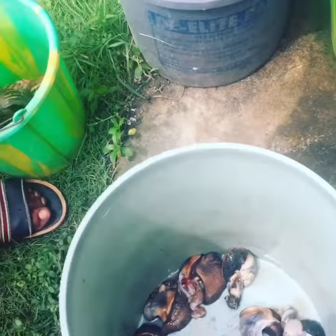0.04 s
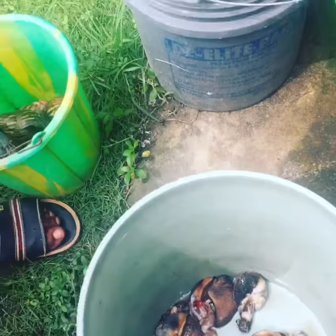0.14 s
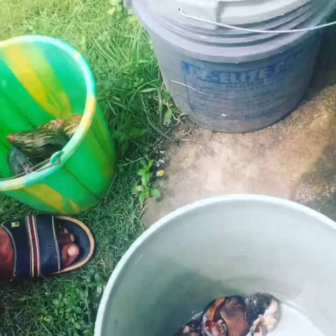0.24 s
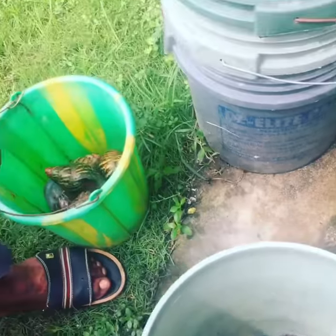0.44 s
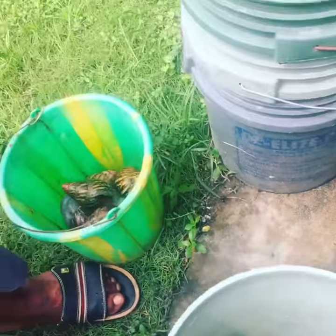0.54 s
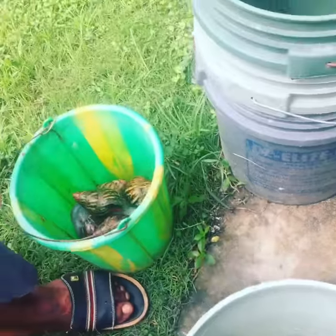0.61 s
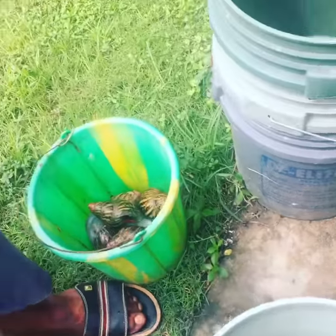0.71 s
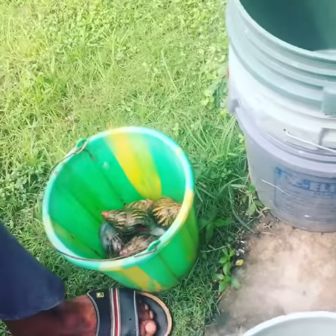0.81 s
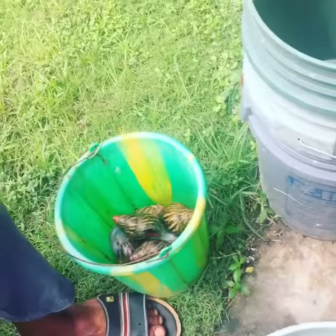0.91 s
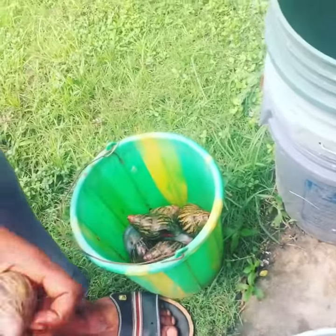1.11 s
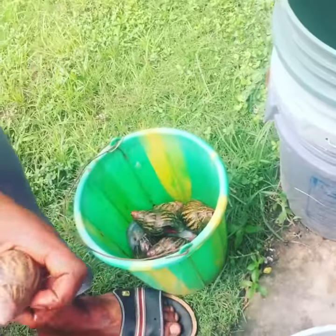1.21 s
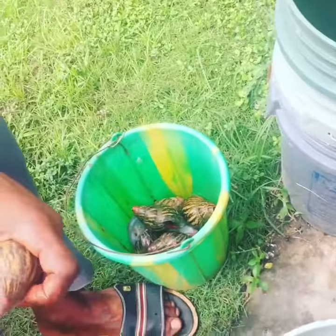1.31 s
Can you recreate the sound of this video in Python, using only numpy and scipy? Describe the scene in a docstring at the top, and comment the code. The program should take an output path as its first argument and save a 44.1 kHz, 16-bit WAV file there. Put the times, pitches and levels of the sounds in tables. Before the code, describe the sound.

A snail shell knocks once, hard and sharp, against a plastic bucket at about 0.2 seconds, with a very brief ring. A soft hiss swells behind it and fades by 0.4 seconds. A few faint hollow bumps follow between 0.5 and 0.7 seconds, and tiny handling ticks continue until about 1.3 seconds. A quiet, low outdoor rumble and thin hiss lie underneath throughout.

```python
"""A low outdoor rumble and thin hiss come first; 0.2 s in, a snail shell is knocked once, hard. The impact
excites the shell's damped modes; a duller reflection of it follows within 9 ms, then a faint second contact.
Plastic buckets and the ground scatter a brief reverberation, and a soft hiss swells and fades behind the knock.
Then only a few faint, hollow bumps and handling ticks sound over the background."""
import sys
import numpy as np
from scipy import signal
from scipy.fft import rfft, irfft, next_fast_len
from scipy.io import wavfile
from scipy.ndimage import map_coordinates

SR = 44100
rng = np.random.default_rng(int(sys.argv[2]) if len(sys.argv) > 2 else 0)


def dump(signal):
    """Clip the signal to [-1, 1] and save it as 16-bit WAV at the path in sys.argv[1]."""
    limited = np.clip(np.atleast_2d(signal).T, -1, 1)
    pcm = np.round(limited * 32767).astype(np.int16)
    wavfile.write(sys.argv[1], SR, pcm)


N = 59535
T = np.arange(N) / SR


def amp(db):
    """Amplitude ratio of a level in decibels."""
    return 10 ** (np.asarray(db) / 20)


def unit(x):
    """Normalisation to rms 1."""
    return x / np.sqrt(np.mean(x ** 2) + 1e-20)


def along(points, hz):
    """Interpolation of (frequency, value) points on a log frequency axis."""
    freqs, values = np.transpose(points)
    return np.interp(np.log(hz + 1), np.log(freqs + 1), values)


def curves(rows):
    """Linear interpolation in time of each column after the first."""
    times, *columns = np.transpose(rows)
    return [np.interp(T, times, column) for column in columns]


def wobble(rate):
    """Smooth random modulation, rate knots a second."""
    return map_coordinates(rng.standard_normal(int(N * rate / SR) + 4), [T * rate])


def filtered(x, response):
    """Zero-phase filtering: the spectrum times a frequency response."""
    size = next_fast_len(N + SR // 2)
    return irfft(rfft(x, size) * response(np.fft.rfftfreq(size, 1 / SR)), size)[:N]


def noise(spectrum):
    """Spectral shaping of white noise, at rms 1."""
    return unit(filtered(rng.standard_normal(N), lambda hz: amp(along(spectrum, hz))))


def since(start):
    """Seconds since start, zero before it."""
    return np.maximum(T - start, 0)


def fade(t, rise, t60):
    """Exponential decay, 60 dB in t60 seconds, after a quick rise."""
    return (1 - np.exp(-t / rise)) * np.exp(-np.log(1000) * t / t60)


def mode(t, hz, db, rise, t60):
    """Free vibration of one mode: a damped sinusoid."""
    return amp(db) * np.sin(2 * np.pi * hz * t) * fade(t, rise, t60)


# rumble spectrum (frequency [Hz], relative level [dB])
RUMBLE_SPECTRUM = [(20, -34), (30, -15.5), (48, -2.5), (80, -3), (102, -5.5), (150, -15.5), (206, -16.5),
                   (265, -23), (400, -26), (650, -51), (1100, -120)]
# envelope of rumble and hum together (time [s], gain [dB])
BASS_GAIN = [(0, 5.5), (.08, 1), (.11, -7.5), (.17, -2), (.2, -2), (.33, 1.5), (.38, -1), (.55, -1),
             (.7, 1), (1.05, -1), (1.35, 1.5)]
def rumble_and_hum():
    """Amplitude modulation: low noise and a wavering hum rise and fall together."""
    rumble = amp(-50) * noise(RUMBLE_SPECTRUM)
    hum_hz, drift_rad = 75.3, .5
    hum_gain = amp(-53 - .5 * wobble(15))
    hum = hum_gain * unit(np.sin(2 * np.pi * hum_hz * T + drift_rad * wobble(6.6)))
    bass_db, = curves(BASS_GAIN)
    return amp(bass_db) * (rumble + hum)


# spectrum of the thin hiss (frequency [Hz], relative level [dB])
AIR_SPECTRUM = [(240, -36), (400, -16.5), (425, -1.5), (665, -7), (947, -8.5), (3140, -16), (3500, -16.5),
                (10400, -25), (14900, -28), (15800, -32.5)]
# its envelope (time [s], level [dB])
AIR_ENVELOPE = [(0, -67.5), (.15, -69), (.5, -68), (.8, -69), (.98, -67.5), (1.08, -68), (1.25, -64.5),
                (1.35, -67)]
def air():
    """Broadband noise under a slow envelope: the thin outdoor hiss."""
    air_db, = curves(AIR_ENVELOPE)
    return amp(air_db) * noise(AIR_SPECTRUM)


# handling ticks (time [s], level [dB], centre frequency [Hz], half-width [octaves], T60 [s])
HANDLING_TICKS = [(.412, -53.5, 9054, 0.64, 0.0115), (0.761, -68, 3700, .2, 0.027),
                  (0.869, -63.5, 13500, 0.17, .03), (.936, -54, 14500, .09, .028),
                  (1.133, -61.5, 10000, 0.33, 0.026), (1.180, -59, 4100, .07, 0.027),
                  (1.250, -62, 14000, .12, .03), (1.255, -70, 3510, 0.015, 0.29),
                  (1.262, -67, 5800, .03, 0.14)]
def ticks():
    """Band-limited noise bursts: the narrower the band, the more a tick clinks with a pitch."""
    out = np.zeros(N)
    for start, db, centre_hz, octaves, t60 in HANDLING_TICKS:
        white = rng.standard_normal(N)
        band = filtered(white, lambda hz: 1 / np.hypot(1, np.log2((hz + 1) / centre_hz) / octaves))
        out += amp(db) * unit(band) * fade(since(start), rise=.0013, t60=t60)
    return out


# faint bumps (time [s], level [dB], frequency [Hz])
HOLLOW_BUMPS = [(.470, -43, 362.6), (0.517, -50, 416), (0.664, -43, 185)]
def bumps():
    """Damped resonance: each soft contact excites one low, hollow mode."""
    return sum(mode(since(start), hz, db, rise=.0072, t60=.12) for start, db, hz in HOLLOW_BUMPS)


# envelopes of the swelling hiss (time [s], midrange level [dB], treble level [dB])
SWELL_ENVELOPES = [(.12, -80, -86), (.16, -69.5, -70.5), (.19, -57.5, -63), (.22, -54, -62.5),
                   (.265, -52.5, -62), (.29, -54, -52), (.315, -51.5, -51.5), (.34, -61.5, -60),
                   (.365, -60, -61), (.40, -71.5, -69.5), (.44, -68, -84), (.52, -90.5, -90)]
# spectra of its two bands (frequency [Hz], relative level [dB])
MIDRANGE_SPECTRUM = [(200, -25.5), (420, 0), (650, -9), (1000, -6), (1600, -10), (1850, 2), (2200, -1.5),
                     (2900, -5.5), (3300, 0.5), (3700, -9.5), (4600, -16), (5450, -4), (6300, -9.5),
                     (16000, -39)]
TREBLE_SPECTRUM = [(1000, -29), (4500, -17.5), (7000, -8), (9000, -5), (10500, -6), (12000, 0.5),
                   (15000, -2.5), (16000, -4)]
def swell():
    """Spectral balance: a hiss grows through the knock, brightens as its treble band rises, and fades."""
    midrange_db, treble_db = curves(SWELL_ENVELOPES)
    return amp(midrange_db) * noise(MIDRANGE_SPECTRUM) + amp(treble_db) * noise(TREBLE_SPECTRUM)


# reverberation time of the yard (frequency [Hz], T60 [s])
YARD_T60 = [(300, .2), (1000, 0.16), (2200, .075), (5500, 0.086), (12000, 0.028)]
def yard(x):
    """Reverberation: buckets and ground scatter the sound into a diffuse tail whose treble dies first."""
    hz, t, spectra = signal.stft(rng.standard_normal(SR // 2), SR, nperseg=256)
    decay = np.exp(-np.log(1000) * t / along(YARD_T60, hz)[:, None])
    _, tail = signal.istft(spectra * decay, SR)
    tail *= 1 - np.exp(-T[:len(tail)] / .006)  # the reflections build up
    return amp(-16.5) * signal.fftconvolve(x, tail / np.linalg.norm(tail))[:N]


# bands the shell hardly radiates (centre frequency [Hz], bandwidth [Hz], gain [dB])
ANTIRESONANCES = [(1647, 150, -20.5), (4500, 800, -17.5)]
def shell_radiation(x):
    """Radiation efficiency: resonances cancel in certain bands, and a small body gives little bass."""
    for hz, width_hz, depth_db in ANTIRESONANCES:
        band = signal.lfilter(*signal.iirpeak(hz, hz / width_hz, fs=SR), x)
        x = x - (1 - amp(depth_db)) * band
    return signal.lfilter(*signal.butter(2, 330, "high", fs=SR), x)


# arrivals of the knock: the contact, its duller reflection, a faint second contact (delay [s], gain [dB], low-
# pass cutoff [Hz])
KNOCK_ARRIVALS = [(0, 2, 12070), (.00854, -3.2, 2460), (0.0294, -20, 1720)]
# modes they excite (frequency [Hz], relative level [dB], T60 [s])
SHELL_MODES = [(424, -36.5, .085), (598, -40.5, .05), (993, -27, 0.039), (1446.5, -33.5, .025),
               (1893, -22, .032), (2152, 3.5, 0.0048), (2350, -21.5, .032), (2926, -13.5, 0.018),
               (3350, -25, .05), (3830, -19, .015), (3960, -17.5, .015), (5470, -12.5, 0.014),
               (6040, -23.5, .012), (7050, -31.5, .014)]
# spectrum of the contact noise (frequency [Hz], relative level [dB])
CRACK_SPECTRUM = [(300, -24), (1500, -5), (6000, -3), (8000, -4.5), (11000, -9.5), (14000, -6),
                  (16000, -11)]
def shell_knock():
    """Impact excitation: each arrival carries the same ringing modes and short crack; the softer ones are
    duller."""
    onset_s, attack_s = .2046, .00085
    out = np.zeros(N)
    for delay, gain_db, cutoff_hz in KNOCK_ARRIVALS:
        t = since(onset_s + delay)
        ring = sum(mode(t, hz, db, attack_s, t60) for hz, db, t60 in SHELL_MODES)
        crack = amp(-32) * noise(CRACK_SPECTRUM) * fade(t, attack_s, t60=.016)
        out += amp(gain_db) * signal.lfilter(*signal.butter(2, cutoff_hz, fs=SR), ring + crack)
    return shell_radiation(out)


def scene():
    """Superposition: the knock and its reflections add to the quiet sounds of the yard."""
    knock = shell_knock()
    return (knock + yard(knock) + swell() + bumps() + ticks() + air() + rumble_and_hum())[None]


def record(dry):
    """Band limiting: an ideal low-pass filter at 16 kHz."""
    return filtered(dry[0], lambda hz: hz < 16000)[None]


dry = scene()
out = record(dry)
dump(out)
```